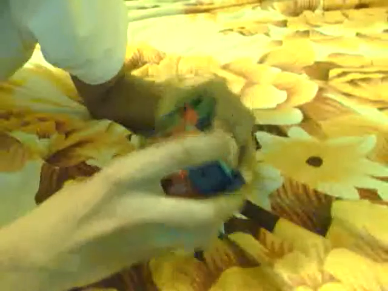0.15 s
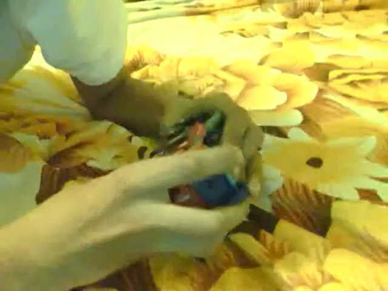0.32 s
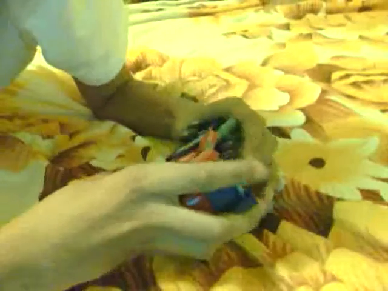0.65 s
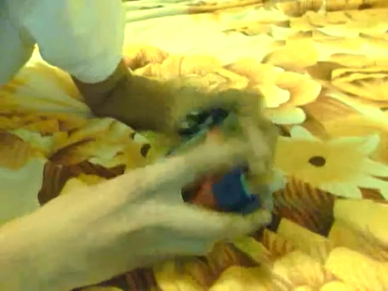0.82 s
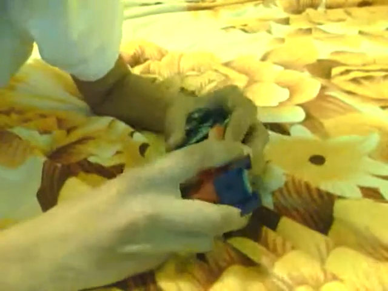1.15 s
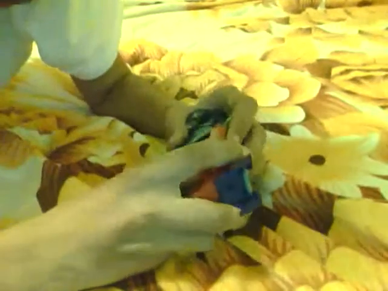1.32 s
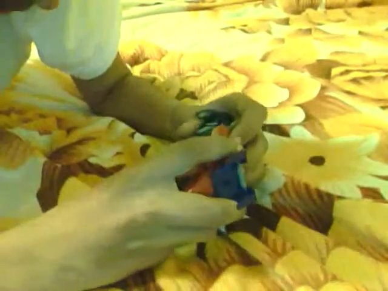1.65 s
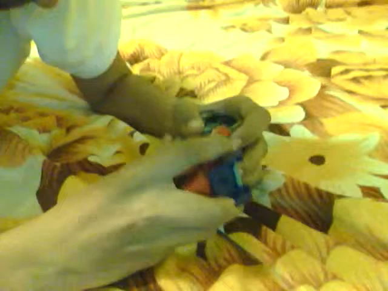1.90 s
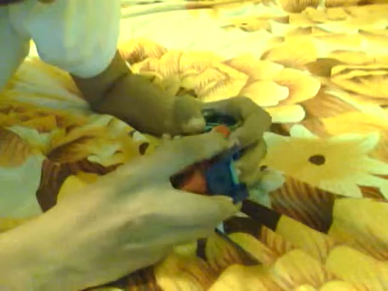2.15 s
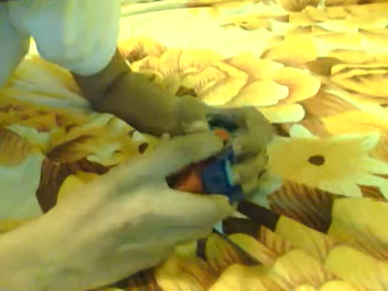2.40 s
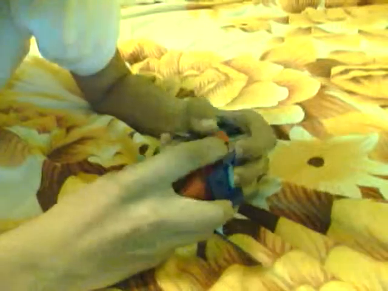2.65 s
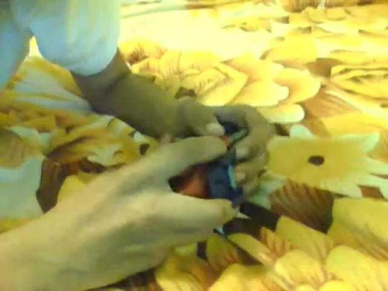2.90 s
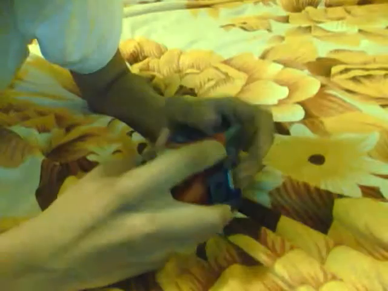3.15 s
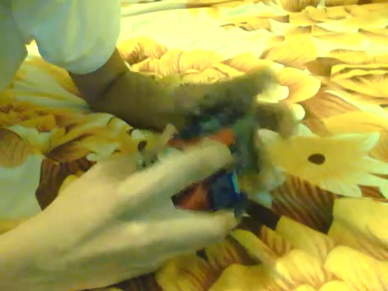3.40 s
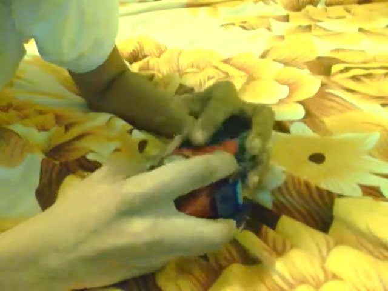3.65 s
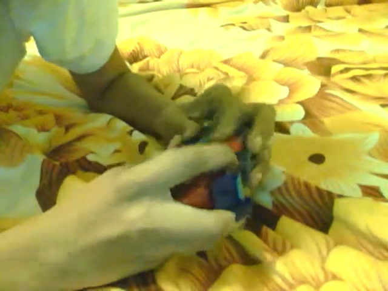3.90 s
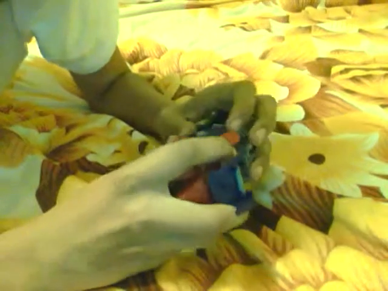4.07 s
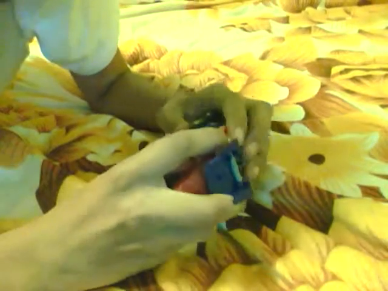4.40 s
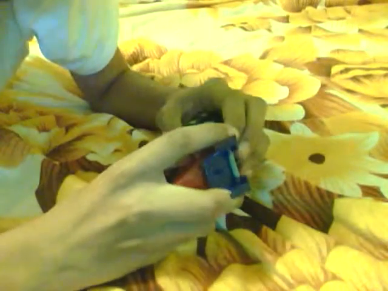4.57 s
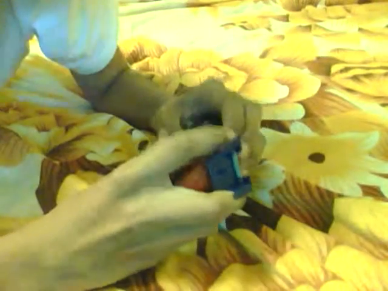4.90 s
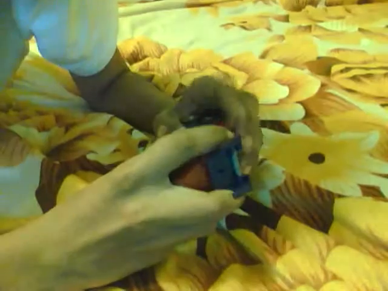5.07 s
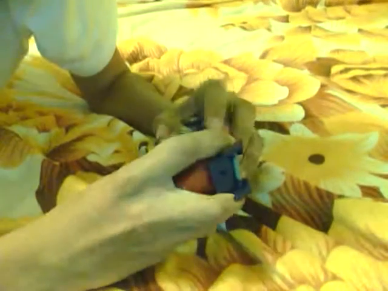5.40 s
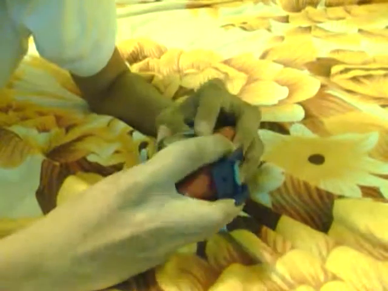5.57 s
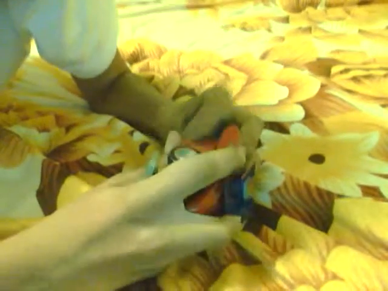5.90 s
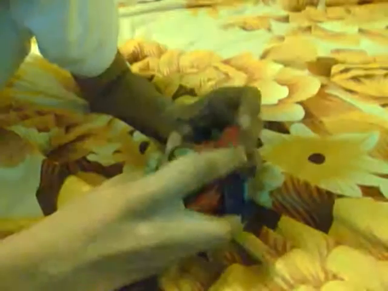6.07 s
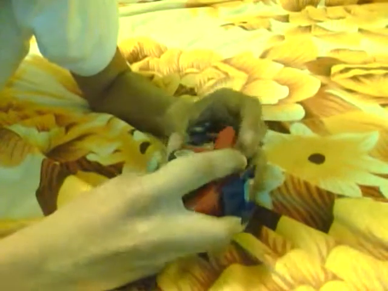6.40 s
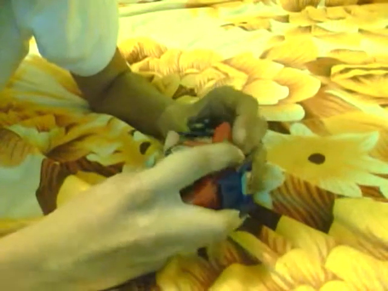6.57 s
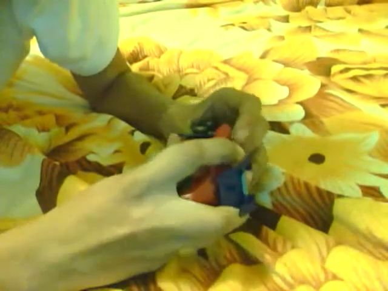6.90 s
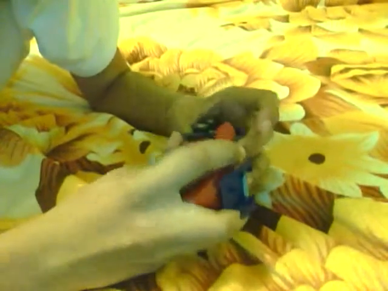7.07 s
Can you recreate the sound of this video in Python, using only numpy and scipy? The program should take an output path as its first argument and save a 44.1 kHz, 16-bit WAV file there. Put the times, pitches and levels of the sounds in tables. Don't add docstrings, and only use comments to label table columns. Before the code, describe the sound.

Close, dry plastic clacks and brief scrapes from a jointed toy being twisted, quieting to faint presses, then locking with harsh overloaded cracks.

```python
import sys
import numpy as np
from scipy import signal
from scipy.fft import rfft, irfft, next_fast_len
from scipy.io import wavfile
from scipy.ndimage import uniform_filter1d

SR = 44100
rng = np.random.default_rng(int(sys.argv[2]) if len(sys.argv) > 2 else 0)


def persist_wave(psi):
    counts = np.round(np.clip(psi, -1, 1) * 32767).astype(np.int16)
    wavfile.write(sys.argv[1], SR, np.atleast_2d(counts).T)


def level_to_linear(level):
    exponent = np.asarray(level, float) / 20
    return 10 ** exponent


N = 319284

# lowest [f/Hz], highest [f/Hz], width [f/Hz]
PLASTIC_MODES = [
    (-150, 170, 940),
    (3788.5, 5940, 995),
    (7398.5, 8600, 1570),
]
# [t/s], edge [level/dB], limb [level/dB], shell [level/dB], shell
# pitch [f/Hz]
KNOCKS = [(0.0612, -3.5, -21.5, -17, 2570), (0.0777, -8, -27.5, -19.5, 2650),
          (0.0948, -14, -33, -21, 2740), (0.1305, -7.5, -28, -22.5, 2900),
          (0.4466, -27.5, -39, -40, 3370), (0.5175, -2.5, -23, -22.5, 2610),
          (0.5739, -8.5, -18.5, -22, 2980), (0.7494, -14.5, -26, -21.5, 3600),
          (0.832, -34, -33, -31, 3450), (0.8666, -7, -22.5, -26, 3220), (0.93, -41, -51, -35, 2650),
          (0.9712, -20.5, -45.5, -54, 3105), (1.0817, -0.5, -26, -26, 3060),
          (1.0906, -18.5, -33, -27, 2820), (1.2125, -14.5, -30.5, -30, 3470),
          (1.28, -19, -32.5, -35, 2750), (1.328, -30, -54, -37, 2700),
          (1.373, -3.5, -23.5, -28.5, 1250), (1.3998, -26, -42, -30.5, 2660),
          (1.4297, -15, -45, -32.5, 1990), (1.5331, -17.5, -57, -41.5, 2230),
          (1.6128, -19.5, -33.5, -36, 2070), (1.6467, -25, -34, -40, 1840),
                  (1.683, -28, -51, -42.5, 1970), (1.7561, -3.5, -24, -39.5, 2120),
                  (1.8286, -17, -41, -45, 2040), (1.8699, -21, -33, -40, 2640),
                  (1.9572, -9, -26.5, -31.5, 2600), (1.9849, -19.5, -29, -31.5, 2670),
                  (2.1378, -14, -27.5, -35.5, 2660), (2.2885, -13.5, -24, -33, 2590),
                  (2.325, 1, -15.5, -27, 2930), (2.5064, -1.5, -17, -17.5, 3700),
                  (2.6095, -9.5, -24.5, -36, 2740), (2.71, -24, -30, -31, 2630),
                  (2.738, -10, -26, -37, 2710), (3.2301, -24, -41, -44, 2520), (3.25, -25, -39, -38, 3200),
                  (3.278, -16.5, -37, -28.5, 3200), (3.3329, -23, -28, -36, 2580),
                  (3.422, -22, -29.5, -26.5, 3070), (3.5664, -22, -31.5, -27, 2660),
                  (3.5892, -24.5, -36, -33.5, 2580),
          (3.6388, -30, -43, -38.5, 2600), (3.6886, -45, -55, -37, 2270),
                   (3.7296, -32, -33.5, -36, 3650), (3.8168, -33, -48, -25.5, 3580),
                   (4.0342, -18, -35, -32, 3670), (4.5432, -6.5, -18, -39, 3690),
                   (4.5702, -10, -27.5, -32.5, 2750), (4.615, -33, -41, -29.5, 2580),
                   (4.6326, -36, -20.5, -30.5, 2840), (4.7082, -44, -37, -33.5, 2660),
                   (4.7224, -17.5, -30.5, -36.5, 2700), (4.8396, -50, -70, -31.5, 2520),
                   (4.8698, -50, -60, -33, 2590), (4.8941, -59, -46.5, -30, 2660),
                   (5.1427, -18, -32.5, -36.5, 2880), (5.2793, -52.5, -33.5, -41, 2900),
                   (5.495, -30, -47, -46, 1640), (5.52, -24.5, -47, -53, 1660),
                   (5.5726, -53, -57, -35, 2720), (5.6448, -45, -62, -36.5, 2700),
          (5.7188, -9.5, -41, -18, 3640), (5.7818, -1.5, -15, -21.5, 2350),
                 (5.7862, 7.5, -10, -13.5, 3150), (5.8706, -1.5, -17.5, -18.5, 3440),
                 (6.2608, -4, -24, -33, 3500), (6.3744, -30, -46, -32, 2610),
                 (6.4345, -4, -11, -18.5, 3730), (6.5889, -43, -57, -43, 970),
                 (6.7025, -31, -55, -42, 1940), (6.9468, -41, -45, -57, 3140),
                 (7.1856, 2, -15.5, -9.5, 3390), (7.199, -5.5, -24, -30, 3200),
          (0.5072, -18.5, -31, -26.5, 3040), (0.5707, -13, -33, -36, 3430), (1.3468, -44, -56, -38, 2570),
          (1.7499, -15, -45, -40, 2000), (2.3194, -30, -44, -36, 2720), (2.496, -13, -22, -33.5, 2360),
          (3.0102, -23, -32, -12, 4900), (3.3297, -25, -48, -40.5, 2550), (4.53, -19, -51, -35, 2480),
          (4.659, -44, -54, -29.5, 2850), (5.834, -8, -24.5, -21.5, 3210), (5.9488, -9, -38.5, -19, 3300),
          (5.9582, -5.5, -30.5, -6, 5900), (5.961, -12, -25, -26, 3670), (6.2677, -10, -23, -21, 3370),
          (6.5802, -50.5, -66, -45.5, 1570)]
FIDGETS = [(0.0154, -26, -50, -35.5, 3200), (0.0406, -28, -45, -55, 2580), (.289, -38, -56, -46, 2850),
           (0.4592, -33, -37, -54, 3800), (0.474, -32, -46, -46, 3370), (.66, -44, -44, -50, 2890),
           (.6725, -36, -36, -51, 3790), (.7243, -40, -58, -58, 3470), (0.7685, -28, -52, -46, 3430),
           (0.849, -30, -42, -48, 3100), (.9514, -34, -57, -61.5, 2410), (0.991, -36, -42, -51.5, 2850),
           (1.034, -24, -53, -57, 2850), (1.122, -32, -38, -33, 2700), (1.263, -26, -46, -45, 2700),
           (1.354, -25.5, -46, -42.5, 2930), (1.4734, -25, -52, -35, 2120), (1.499, -26, -57, -40, 2210),
           (1.536, -16.5, -46, -37.5, 2210), (1.737, -38, -54, -45.5, 3600), (1.8148, -29, -48, -53, 2170),
           (1.852, -30, -48, -46, 2130), (1.889, -23.5, -42, -45, 2100), (2.567, -33, -45, -50, 2440),
           (2.87, -30, -38, -41, 3500), (3.1124, -19, -42, -41, 3800), (3.1246, -24, -40, -42, 3260),
           (3.3271, -26, -46, -42, 2540), (3.3538, -29, -54, -51, 2620), (3.4483, -30, -36, -43, 3460),
           (3.661, -34, -53, -40, 3260), (3.673, -39, -40.5, -45, 2390), (3.7184, -35, -53, -44, 3600),
           (3.8446, -27, -42, -42, 3150), (4.0165, -48, -53, -58, 3800), (4.1705, -38, -59, -64, 2130),
           (4.975, -60, -57.5, -48.5, 2730), (5.031, -44, -58.5, -50, 2630),
                (5.0928, -37, -58, -52, 2750), (5.2597, -45, -49, -49, 3070),
                (5.479, -38, -49.5, -61, 1780), (5.679, -34.5, -55.5, -55, 3270),
                (5.6968, -28, -42, -47, 3450), (5.7105, -44, -47.5, -43, 3310),
                (6.1699, -49.5, -60, -56, 3260), (6.348, -29.5, -51.5, -39, 3500),
                (6.6224, -31, -55, -45, 3680), (6.6425, -36, -52, -61, 3600),
                (6.6653, -34, -54.5, -55, 3510), (7.0967, -48.5, -58.5, -67.5, 1930)]
# [t/s], edge [level/dB], limb [level/dB]
TICKS = [(0.1851, -14, -29), (0.3439, -10.5, -22), (0.524, -5.5, -17.5), (0.581, -8, -18),
         (0.8972, -16.5, -29), (1.0206, -22.5, -42), (1.0658, 0, -23), (1.193, -16, -19),
         (1.5776, -12, -34.5), (1.7647, -7, -29), (2.016, -21, -41), (2.1069, -1.5, -19.5),
         (2.259, -18, -26), (2.385, -22.5, -30), (2.437, -16.5, -31.5), (2.443, -11.5, -33.5),
         (2.768, -26, -32.5),
         (2.8067, -9, -23), (2.8462, -17.5, -37), (3.01, -3, -25.5), (3.1034, -13, -23),
              (3.1396, -27.5, -29), (3.396, -7.5, -21), (3.89, -11.5, -32), (4.0776, -39.5, -28),
              (4.3462, -30, -74), (4.6647, -16, -53.5), (5.051, -42, -37), (5.355, -28.5, -39.5),
              (5.8521, -0.5, -9), (5.9579, -1.5, -11), (6.0295, -17, -29.5), (6.2765, -3, -13),
              (6.281, -7, -21), (6.293, -16, -32), (6.6347, -31, -42), (6.837, -17, -25),
         (1.168, -30, -39), (2.2951, -19.5, -37), (2.462, -18, -27), (5.8248, 6, -14), (5.941, -12, -22),
          (5.9326, -12, -22), (1.1796, -13.5, -49.5), (1.3744, -17, -54), (1.951, -32, -60),
          (2.2517, -21, -29), (2.4776, -13, -52), (2.616, -18, -24), (2.7782, -18, -30.5),
          (2.9912, -30, -35), (3.474, -16, -56), (3.497, -39, -28), (5.7954, -1, -15), (5.954, -28, -38),
          (6.2349, -36, -67), (6.4224, -22.5, -38), (6.4644, -26.5, -30), (7.165, -18, -67)]
# [t/s], [level/dB], dullness [level/dB], decay by 60 dB [t/s]
CRUNCHES = [(0.347, -27, 6, 0.096), (0.52, 0, -14, 0.1), (1.089, -15, -1, 0.076), (3.816, -18, -7, 0.16),
            (3.888, -23, -9, 0.23), (5.24, -59, 6, 0.41), (3.012, -20, -11.5, .09),
            (3.106, -24, -12.5, 0.13), (5.783, -6.5, -0.5, 0.14), (5.841, 12, -15, 0.12),
            (6.263, -6.5, -14, 0.14), (6.435, -21, -7, 0.096), (6.698, -29.5, 0, 0.23),
            (6.965, -38, 6, 0.23), (7.185, -19.5, 0.5, 0.15)]
# [t/s], length [t/s], [level/dB], dullness [level/dB]
SLIDES = [(0.0, 0.22, -47.5, -1.5), (0.282, 0.2, -55.5, -3), (0.495, 0.16, -46.5, -1),
          (0.836, 0.17, -46.5, -2), (1.116, 0.17, -52, -1.5), (1.258, 0.049, -43, -3),
          (1.3, 0.098, -57, -1.5), (1.389, 0.2, -40, -10), (1.55, .15, -51, 1.5), (1.754, 0.2, -52, 3),
          (1.958, 0.17, -49.5, -6.5), (2.27, 0.089, -53, -6), (2.454, 0.14, -54, -0.5),
          (2.76, 0.12, -50, -3.5), (3.238, 0.54, -45.5, -5.5), (4.04, 0.086, -57, -12),
          (4.533, 0.073, -37.5, 2.5), (4.61, 0.16, -46.5, 1.5), (5.002, 0.105, -61, 1.5),
          (5.137, 0.032, -55, -9), (5.491, 0.048, -45.5, -2.5), (5.739, 0.14, -49.5, 1),
          (5.745, 0.027, -47.5, 0.5), (5.871, 0.14, -33, -3), (5.954, .11, -43.5, -13.5),
          (6.16, 0.051, -56, -8), (6.248, 0.26, -47.5, -2), (6.433, 0.1, -55.5, 0.5),
          (6.585, 0.084, -53.5, -9), (6.839, 0.13, -55, -13.5)]
# [t/s], length [t/s], [level/dB], pitch [f/Hz]
SKIDS = [
    (2.614, 0.01, -48, 1480),
    (3.805, 0.047, -49.5, 940),
    (5.24, 0.019, -53.5, 1850),
    (6.474, 0.014, -48.5, 1606),
    (6.696, 0.014, -44.5, 1526),
]
# [t/s], sway [level/dB], spring [level/dB], cloth [level/dB]
LEANS = [(0.0, -33.5, -37, -48.5), (.36, -34.5, -45, -50.5), (.6, -40, -44, -53), (.7, -44.5, -46.5, -64),
         (.89, -54, -42.5, -50.5), (1.33, -43.5, -46, -52), (1.52, -45, -46.5, -49), (2.04, -46, -52, -58),
         (2.36, -47, -54.5, -55), (2.69, -41, -40.5, -61), (2.85, -43, -49, -62), (3.13, -55, -43.5, -55.5),
         (3.37, -41, -44, -72), (3.51, -45, -50, -61), (3.87, -50, -51.5, -60), (4.03, -49, -55.5, -64),
         (4.22, -48.5, -51.5, -58), (4.83, -42, -68.5, -53), (5.23, -48, -62, -69.5),
         (5.87, -23.5, -38, -41), (6.05, -45, -35, -55.5), (6.16, -41.5, -46.5, -71),
         (6.3, -43.5, -45, -45.5), (6.4, -49, -53, -47.5), (7.2, -50, -49, -45), (7.24, -34, -47, -46)]
MATTRESS_REST_DB = [
    -66,
    -66.5,
    -60.5,
]
# [t/s], [level/dB]
BRUSHING = [(0.0, -47.5), (0.16, -58.5), (0.83, -64), (0.99, -57.5), (1.769, -52.5), (2.02, -65.5),
            (6.35, -68), (6.39, -60.5), (7.24, -76)]
# [f/Hz], density [level/dB per Hz]
ROOM_SPECTRUM = [(18, -37), (30, 5), (287, -10.5), (740, -18.5), (1010, -12), (1350, -18), (2790, -15.5),
                 (5310, -24.5), (8300, -16), (10300, -42.5), (16000, -61.5)]

ROOM_DB = -58
SHELL_DB, LIMB_DB, EDGE_DB = 7, 9, 0
TICK_SHELL_DB, TICK_SHELL_HZ = -6.5, 3200
TICK_HZ, TICK_WIDTH_HZ, TICK_DB = 15000, 3500, -33
CHATTER_MS, CHATTER_MS_PER_DB, CHATTER_SPREAD = 1.72, 0.03, 0.28
GRIP_S, SAG_DB_S, LET_GO_S = 0.01, 2.5, 0.053
SKID_WIDTH_HZ = 660
PORT_HZ, PORT_WIDTH_HZ = 8107, 930
ECHO_DB, ECHO_GAP_S, ECHO_T60_S = -14, 0.003, 0.19
LEAN_DB_S, SETTLE_DB_S = 168.5, 127
TOP_HZ = 15900


def ring(f, hz, width_hz):
    return 1j * f * width_hz / (hz ** 2 - f ** 2 + 1j * f * width_hz)


def port(f):
    return PORT_HZ ** 2 / (PORT_HZ ** 2 - f ** 2 + 1j * f * PORT_WIDTH_HZ)


def through(x, response):
    size = next_fast_len(x.shape[-1], True)
    f = np.arange(size // 2 + 1) * SR / size
    return irfft(rfft(x, size) * response(f), size)[..., :x.shape[-1]]


def unit(x):
    return x / np.sqrt(np.mean(x ** 2))


def walk(rate):
    hold = int(SR / rate)
    levels = rng.standard_normal(N // hold + 1)
    return uniform_filter1d(np.repeat(levels, hold), hold)[:N]


def wander(x, db, rate, lowest_hz, count):
    size = next_fast_len(N, True)
    spectrum = rfft(x, size)
    f = np.arange(size // 2 + 1) * SR / size
    edges = np.r_[0, np.geomspace(lowest_hz, SR / 2, count)]
    out = np.zeros(N)
    for lo, hi in zip(edges, edges[1:]):
        band = irfft(spectrum * ((f >= lo) * (f < hi)), size)[:N]
        out += level_to_linear(db * walk(rate)) * band
    return out


def contacts():
    knocks = KNOCKS
    s, edge, limb, shell, hz = np.transpose(knocks + FIDGETS)
    knock_rows = [s, hz, shell + SHELL_DB, limb + LIMB_DB, edge + EDGE_DB]
    s, edge, limb = np.transpose(TICKS)
    tick_rows = [s, TICK_SHELL_HZ + 0 * s, limb + TICK_SHELL_DB, limb + LIMB_DB, edge + EDGE_DB]
    return np.hstack([knock_rows, tick_rows]).T


def chatter(edge_db, size):
    ms = np.arange(size) / SR * 1000
    luck = np.exp(CHATTER_SPREAD * rng.uniform(-1, 1, edge_db.shape))
    chatter_ms = np.clip((CHATTER_MS + CHATTER_MS_PER_DB * edge_db) * luck, 0.2, 6)
    envelope = (1 - np.exp(-ms / 0.31)) * np.exp(-(ms / chatter_ms) ** 0.88)
    return rng.uniform(-1, 1, (len(edge_db), size)) * envelope


def clicks(size=1024, count=5):
    rows = contacts()
    shell_hz = rows[:, [1]]
    force = chatter(rows[:, 4:], size)
    sound = through(force, lambda f: ring(f, TICK_HZ, TICK_WIDTH_HZ) ** 2)
    loudest_db = rows[:, 2:5].max(axis=1, keepdims=True)
    sound *= level_to_linear(TICK_DB + loudest_db) / np.abs(sound).max(axis=1, keepdims=True)
    for k, (lo, hi, width) in enumerate(PLASTIC_MODES):
        hz = lo + (hi - lo) * (np.arange(count) + rng.random((len(rows), count))) / count
        if k == 0:
            hz = hz + shell_hz
            width = width * shell_hz / 3000
        part = through(force, lambda f: port(f) * sum(ring(f, hz[:, [m]], width) ** 2 for m in range(count)))
        sound += part / np.abs(part).max(axis=1, keepdims=True) * level_to_linear(rows[:, [2 + k]])
    out = np.zeros(N + size)
    for s, click in zip(rows[:, 0], sound):
        at = max(int((s + 0.0003) * SR), 0)
        out[at:at + size] += click
    return out[:N]


def slide(t):
    gains = np.zeros((2, len(t)))
    for s, length, db, dull_db in SLIDES:
        grip = np.clip((t - s) / GRIP_S + 0.5, 0, 1) ** 2
        let_go = np.clip((s + length - t) / LET_GO_S + 0.5, 0, 1) ** 2
        level = level_to_linear(db - SAG_DB_S * np.clip(t - s, 0, 1))
        gains += level * grip * let_go * level_to_linear([[0], [dull_db]])
    return gains


def scrape(slips_per_s=6000, scatter_db=4.0, patchy_db=2.0, step=16):
    t = np.arange(0, N, step) / SR
    edge_gain, shell_gain = slide(t) * level_to_linear(4.4 * walk(30)[::step])
    top_gain = edge_gain * level_to_linear(-8.5)
    for s, db, shell_db, t60 in CRUNCHES:
        fade = (t > s) * level_to_linear(db - 8.5 - 60 * np.clip(t - s, 0, 1) / t60)
        edge_gain = edge_gain + fade
        shell_gain = shell_gain + fade * level_to_linear(shell_db)
        top_gain = top_gain + fade
    slips = (rng.random(N) < slips_per_s / SR) * rng.standard_normal(N)
    slips *= level_to_linear(scatter_db * np.minimum(rng.exponential(size=N), 3.4))
    slips = wander(slips * level_to_linear(patchy_db * walk(150)), 4.53, 12, 1500, count=9)
    edges = unit(through(slips, lambda f: port(f) * ring(f, 6000, 12000) ** 3))
    shell = unit(through(slips, lambda f: level_to_linear(-8.5) * ring(f, 1210, 180)
                         + ring(f, 2400, 1400) + ring(f, 3800, 1300)))
    top = level_to_linear(-29.5) * unit(through(slips, lambda f: ring(f, TICK_HZ, TICK_WIDTH_HZ) ** 2))
    gains = np.repeat([edge_gain, shell_gain, top_gain], step, axis=1)[:, :N]
    return np.sum(gains * [edges, shell, top], axis=0)


def skids():
    rough = rng.standard_normal(N) * level_to_linear(6.2 * walk(160))
    out = np.zeros(N)
    for s, length, db, hz in SKIDS:
        age = np.clip((np.arange(N) / SR - s) / length, 0, 40)
        swell = age * np.exp(1 - age)
        out += level_to_linear(db) * swell * unit(through(rough, lambda f: ring(f, hz, SKID_WIDTH_HZ) ** 2))
    return out


def echo(x):
    s = np.arange(int(0.3 * SR)) / SR
    tail = rng.standard_normal(len(s)) * level_to_linear(-60 * s / ECHO_T60_S) * np.clip(s / ECHO_GAP_S, 0, 1) ** 2
    return level_to_linear(ECHO_DB) * signal.fftconvolve(x, tail / np.sqrt(np.sum(tail ** 2)))[:N]


def lean_gains():
    t = np.arange(0, N, 64) / SR
    leans = np.array(LEANS)
    s, db = leans[:, :1], leans[:, 1:]
    drop_db = np.where(t < s, LEAN_DB_S * (s - t), SETTLE_DB_S * (t - s))
    power = level_to_linear(2 * db.T) @ level_to_linear(-2 * drop_db) + level_to_linear(2 * np.array(MATTRESS_REST_DB))[:, None]
    return np.repeat(np.sqrt(power), 64, axis=1)[:, :N]


def bed():
    jolts = level_to_linear(2.5 * walk(7.5))

    def shaken(response):
        return unit(jolts * through(rng.standard_normal(N), response))

    sway = shaken(lambda f: level_to_linear(-6) * ring(f, 35, 50) ** 2 + ring(f, 27, 20) ** 2)
    spring = shaken(lambda f: ring(f, 107.8, 26) ** 2)
    cloth = shaken(lambda f: ring(f, 265, 290) ** 2)
    return np.sum(lean_gains() * [sway, spring, cloth], axis=0)


def sleeves():
    db = np.interp(np.arange(N) / SR, *np.transpose(BRUSHING)) + 4.5 * walk(14) - 3
    return level_to_linear(db) * unit(through(rng.standard_normal(N), lambda f: ring(f, 380, 200) + ring(f, 890, 310)))


def room():
    hz, db = np.transpose(ROOM_SPECTRUM)
    air = unit(through(rng.standard_normal(N), lambda f: level_to_linear(np.interp(np.log(f + 1), np.log(hz), db))))
    return level_to_linear(ROOM_DB) * wander(air, 2.8, 5.1, 21, count=12)


def scene():
    toy = clicks() + scrape() + skids()
    return (toy + echo(toy) + bed() + sleeves() + room())[None]


def band_limit(x):
    return signal.sosfilt(signal.butter(12, 16290, fs=SR, output="sos"), x)


def record(dry):
    clipped = np.clip(dry, -0.97, 0.97)
    low_pass = signal.ellip(8, 0.2, 50, TOP_HZ, fs=SR, output="sos")
    mix = signal.sosfilt(low_pass, clipped)
    return band_limit(mix)


dry = scene()
out = record(dry)
persist_wave(out)
```